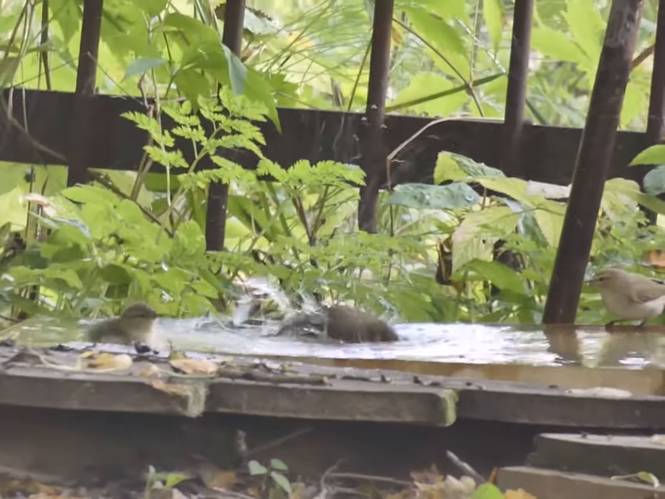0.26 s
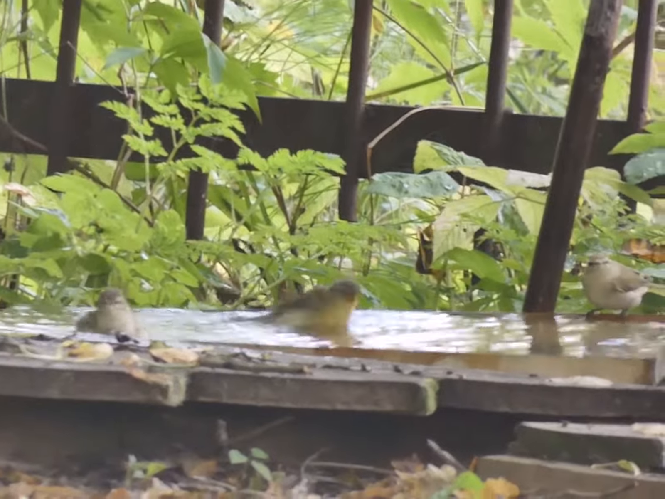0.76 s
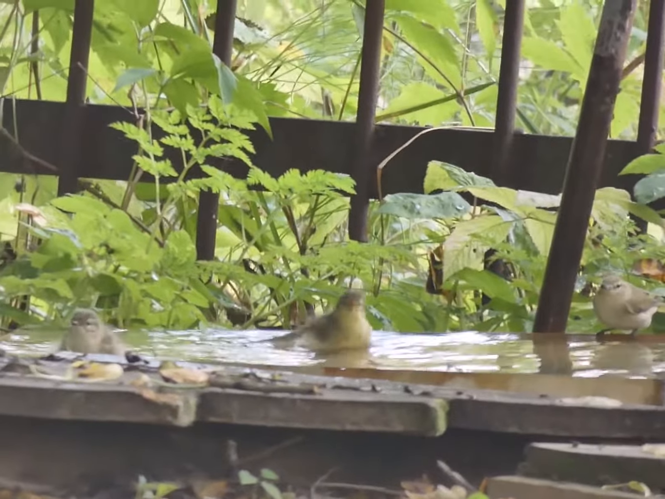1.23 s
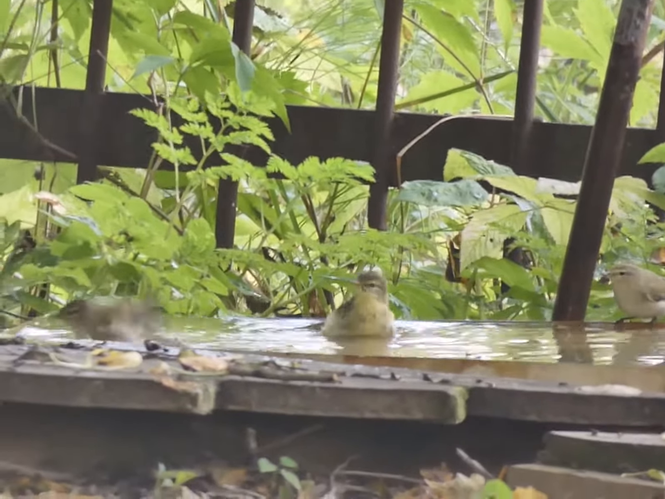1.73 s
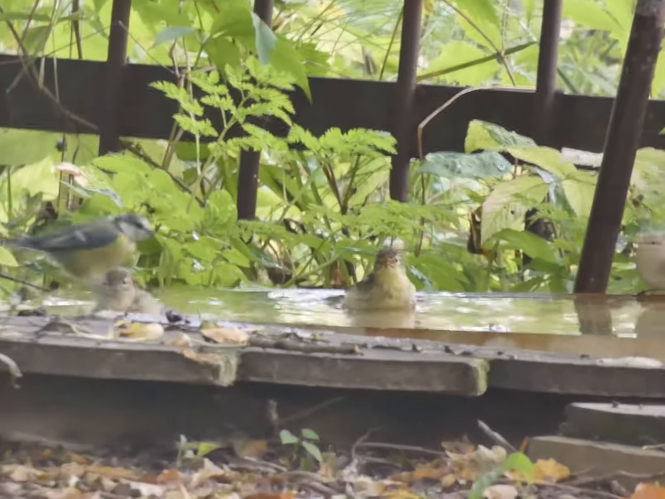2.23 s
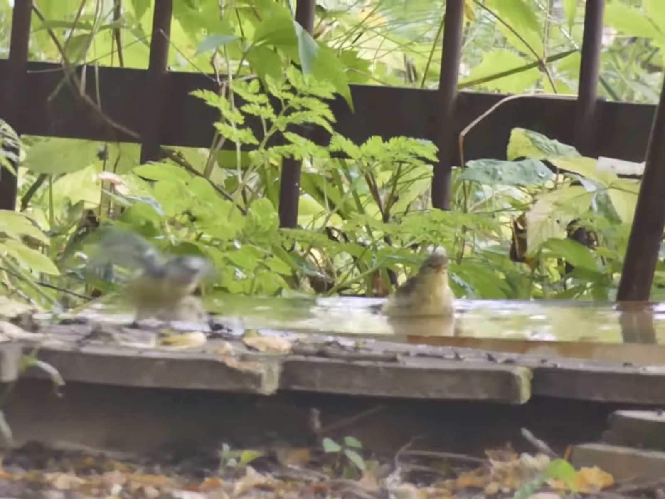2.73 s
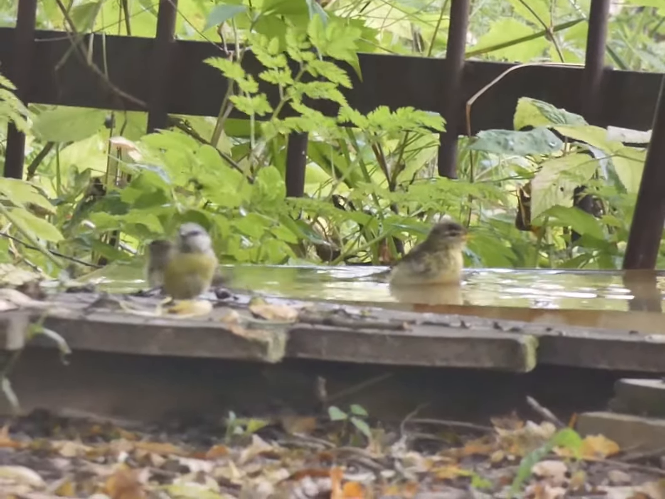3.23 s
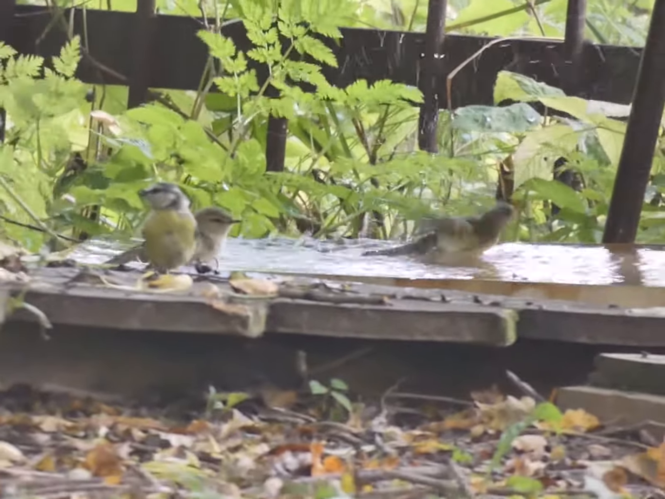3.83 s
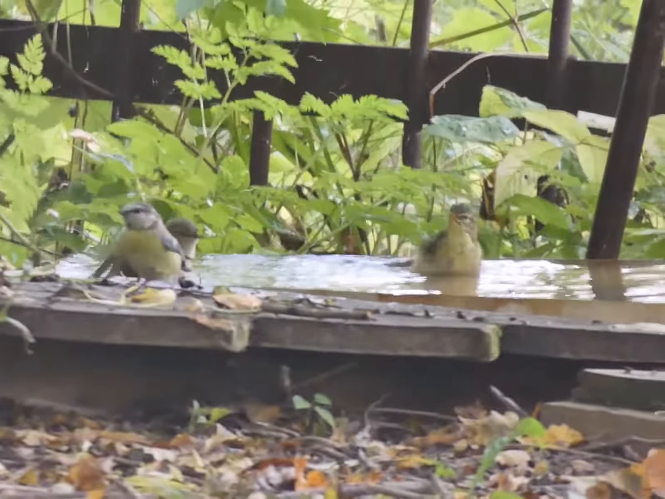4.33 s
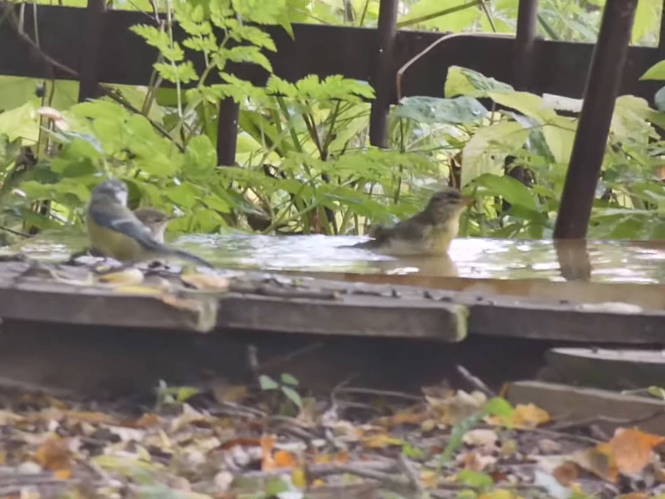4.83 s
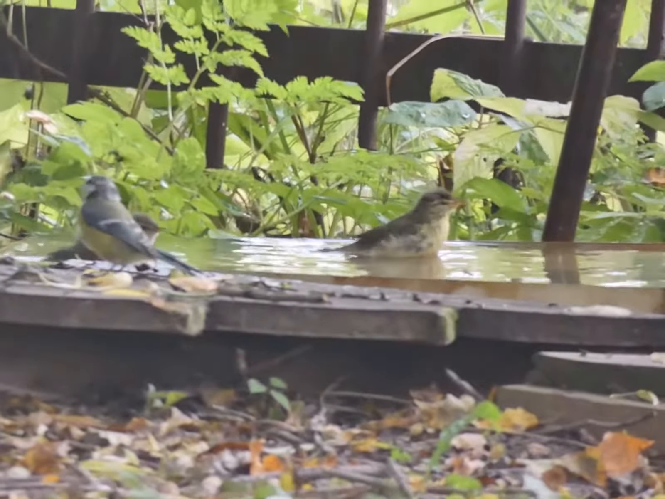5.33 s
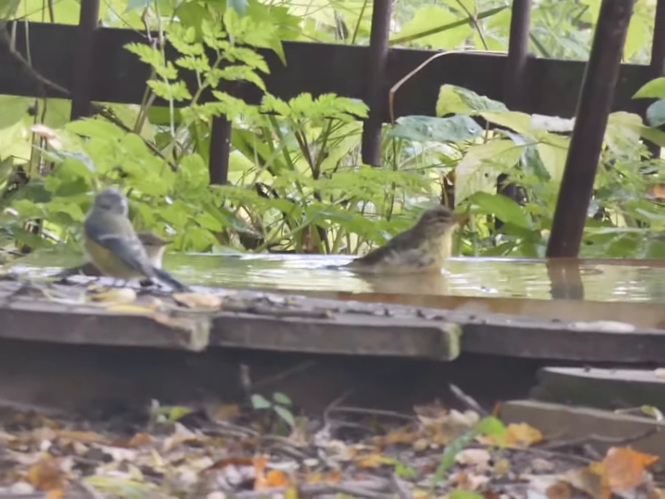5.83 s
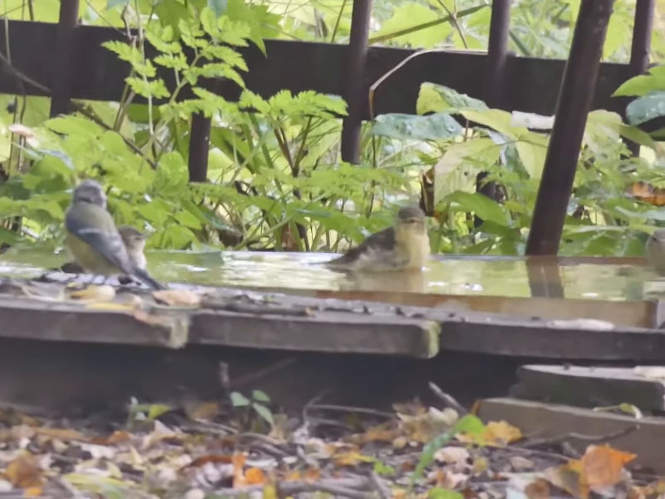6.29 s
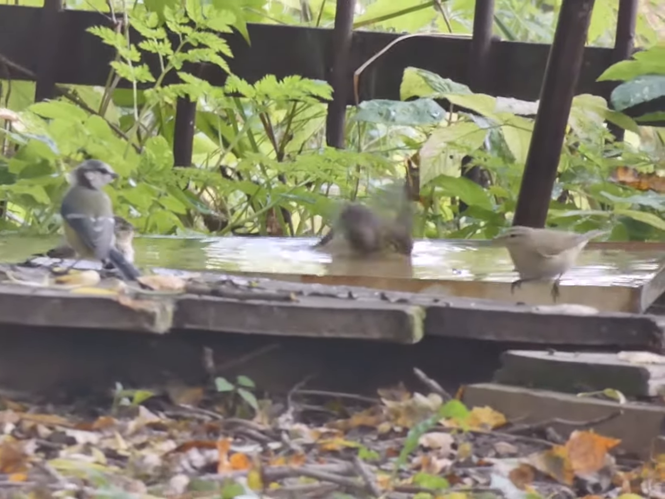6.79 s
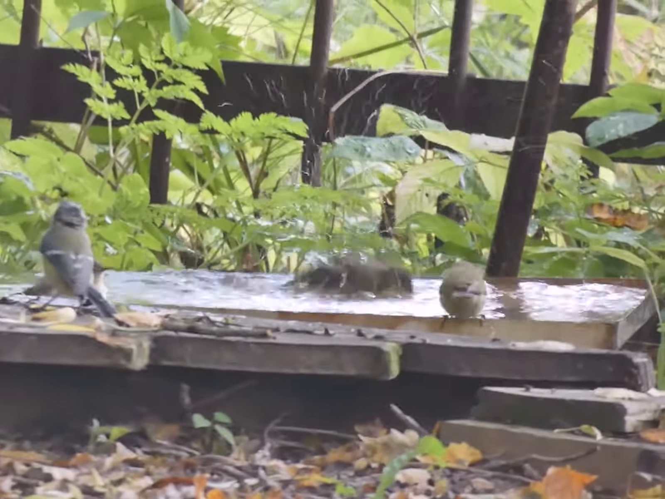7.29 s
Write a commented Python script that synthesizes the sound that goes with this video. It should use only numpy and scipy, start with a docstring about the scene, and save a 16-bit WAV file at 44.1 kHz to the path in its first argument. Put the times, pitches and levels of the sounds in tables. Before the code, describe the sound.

A steady, nearly central hiss runs throughout, with low outdoor rumble and a hollow distant drone around 640 Hz that swells, sinks and flutters, with brief throbs mostly in the first two seconds. A very faint bubbly spray of bathing opens the scene until 0.45 s. Weak wing puffs start at 1.05 s; a stronger low, soft flurry runs from 1.7 to 2.3 s, stirring rumbly air. Another faint splash comes at 3.4-3.9 s. From 3.65 s a small bird twitters: short chirps and thin, rapidly gliding whistles between 4 and 8.5 kHz, busy until 5 s, a tiny tray tick at 4.28 s, then brightest at 5.55-5.95 s and continuing to 6.6 s. The drone drops out briefly near 6.05 s. Small wing puffs follow at 6.5-6.7 s and faintly after 7 s. Sparse chirps come at 6.7, 6.85 and 7.36 s, with a last faint spray at 6.9-7.4 s. The birds are straight ahead, with only slight leafy scatter.

```python
"""One of the small birds bathing in a garden tray twitters in the second half: thin gliding whistles.
Three faint bouts of bathing are sprays of ringing bubbles; the tray gives a tick of filtered noise.
Wings puff the air in short low swings with stirred air around them, as birds come and go.
Behind them lie a steady hiss and low outdoor rumble, both shaped noise, and a hollow distant drone
of resonant noise with brief throbs. The birds are straight ahead of the microphones."""
import sys
import numpy as np
from scipy import signal
from scipy.fft import rfft, irfft, next_fast_len
from scipy.io import wavfile
from scipy.ndimage import uniform_filter1d

SR = 44100
rng = np.random.default_rng(int(sys.argv[2]) if len(sys.argv) > 2 else 0)


def master_out(mix):
    """Clip the mix to full scale and print it as 16-bit PCM to the path in sys.argv[1]."""
    frames = np.transpose(np.atleast_2d(mix))
    ceiling = np.clip(frames, -1, 1)
    pcm = np.round(ceiling * 32767).astype(np.int16)
    wavfile.write(sys.argv[1], SR, pcm)


N = 332955
TIME = np.arange(N) / SR
HOP = 256  # samples between noise frames
BINS = np.fft.rfftfreq(4 * HOP, 1 / SR)
FRAMES = np.arange(N // HOP + 5) * HOP / SR

# puffs of air from wing strokes: (time [s], level [dB], pitch [Hz], length [s])
WING_PUFFS = [(1.053, -45, 199, 0.01), (1.177, -45, 220, .009), (1.243, -43.5, 197, 0.01),
              (1.585, -44.5, 150, .011), (1.712, -35, 187, 0.009), (1.718, -38, 340, 0.0068),
              (1.739, -37, 195, 0.012), (1.799, -27.5, 180, 0.013), (1.824, -30.5, 314, 0.0094),
              (1.843, -39, 245, .016), (1.889, -39.5, 292, 0.013), (1.916, -42, 188, 0.017),
              (2.048, -38, 330, .008), (2.081, -32.5, 400, .01), (2.094, -33.5, 300, 0.007),
              (2.187, -44, 240, 0.013), (2.283, -41, 266, 0.012), (6.53, -44, 200, 0.014),
              (6.585, -41, 165, 0.016), (6.68, -31.5, 205, 0.0085), (6.717, -49, 215, 0.037),
              (7.053, -45, 177, .024), (7.215, -48.5, 150, 0.024)]
# the hiss, before its two parts are blended: (time [s], treble level [dB], body level [dB])
HISS_COURSE = [(0.0, -45.5, -48.5), (0.06, -43, -48), (1.68, -41.5, -46.5), (1.74, -45, -48),
               (1.88, -45, -50), (2.06, -41, -44.5), (2.1, -47, -49.5), (2.33, -42, -45.5),
               (3.61, -44, -47), (3.78, -44.5, -49), (6.94, -47.5, -50), (7.55, -47.5, -49)]


def amp(db):
    """Decibels to gain."""
    return 10 ** (np.asarray(db) / 20)


def unit(x):
    """Scales to an rms of 1."""
    return x / np.sqrt(np.mean(x ** 2) + 1e-20)


def colour(points):
    """A table over log frequency, read at every bin."""
    hz, value = np.transpose(points)
    return np.interp(np.log(BINS + 1), np.log(hz + 1), value)


def course(rows, column=1):
    """One column of a curve over time, read at every frame."""
    rows = np.array(rows)
    return np.interp(FRAMES, rows[:, 0], rows[:, column])[:, None]


def add(mix, s, sound):
    """Mixes a sound in at s seconds."""
    part = mix[max(round(s * SR), 0):][:len(sound)]
    part += sound[:len(part)]


def waver(size, hz):
    """Smooth random motion of rms 1, up to about hz."""
    length = next_fast_len(size)
    spectrum = rfft(rng.standard_normal(length))
    lowpass = np.exp(-(np.fft.rfftfreq(length, 1 / SR) / hz) ** 2)
    return unit(irfft(spectrum * lowpass, length))[:size]


def per_band(shape, lo_hz, hi_hz):
    """Scales a spectrum so that its noise has rms 1 within a band."""
    inside = (BINS > lo_hz) * (BINS < hi_hz)
    return shape / np.sqrt(np.mean(shape ** 2 * inside))


def noise(gain, patchy_db):
    """Stereo noise under a gain over frames and bins, with drifting patches."""
    # stereo width of the noise: (frequency [Hz], side over mid [dB])
    width = [(100, -17), (600, -20), (1000, -19), (5000, -23), (9000, -20), (12000, -14.5), (15000, -11)]
    a, b, c, d, patches = rng.standard_normal((5, len(FRAMES), len(BINS)))
    patches = uniform_filter1d(patches, size=8, axis=0)
    patches = unit(uniform_filter1d(patches, size=9, axis=1))
    mid = a + 1j * b
    side = amp(colour(width)) * (c + 1j * d)
    z = np.array([mid + side, mid - side]) * gain * amp(patchy_db * patches)
    sound = signal.istft(z, nperseg=4 * HOP, noverlap=3 * HOP, time_axis=1, freq_axis=2)[1]
    return sound[:, :N] * np.sqrt(3 / (4 * HOP))  # undoes the scaling of the transform


def whistle(hz, db, jitter=0.0055, shimmer=0.11):
    """One thin tone that follows a pitch and a level, both trembling slightly."""
    size = len(hz)
    pitch = uniform_filter1d(hz, size=130) * (1 + jitter * waver(SR // 4, 430)[:size])
    loud = amp(db) * (1 + shimmer * waver(SR // 4, 240)[:size])
    loud = loud * signal.windows.tukey(size, .04)
    return np.sqrt(2) * loud * np.sin(2 * np.pi * np.cumsum(pitch) / SR)


def chips(before_bend=2.97, after_bend=1.3, turn_s=0.0022, lag_s=0.0071, onset_db=-45, end_db=-48):
    """Short chirps: the pitch bends at a turn, peaking, falling or rising on; loudest just behind it."""
    # (turn time [s], time before [s], time after [s],
    #  start pitch [Hz], turn pitch [Hz], end pitch [Hz], level [dB])
    chip_notes = [(3.66, 0.012, 0.036, 7700, 7250, 6100, -36), (4.008, 0.043, .013, 5450, 6660, 5300, -34),
                  (4.548, .014, 0.015, 4020, 4200, 4000, -37), (4.921, .004, .018, 6600, 6530, 6360, -38),
                  (5.183, 0.009, 0.012, 7150, 5440, 4150, -37.5),
                  (5.279, .01, 0.012, 4150, 4350, 4100, -39), (6.701, .007, .025, 7500, 6470, 5950, -42),
                  (6.845, .035, .03, 4700, 5300, 5440, -40), (7.36, .008, 0.043, 6200, 6100, 5600, -43)]
    out = np.zeros(N)
    for s, before, after, start_hz, turn_hz, end_hz, db in chip_notes:
        t = np.arange(-before, after, 1 / SR)
        from_turn = np.hypot(t, turn_s) - turn_s  # the turn is rounded over turn_s
        near = np.clip(1 - from_turn / np.where(t < 0, before, after), 0, 1)
        # a bend above 1 makes the sweep steepest near the turn
        approach = start_hz + (turn_hz - start_hz) * near ** before_bend
        departure = end_hz + (turn_hz - end_hz) * near ** after_bend
        hz = np.where(t < 0, approach, departure)
        away = np.interp(t, [-before, min(lag_s, after / 2), after], [-1, 0, 1])  # 0 where loudest
        faint_db = np.where(away < 0, onset_db, end_db)
        add(out, s - before, whistle(hz, db + (faint_db - db) * abs(away) ** 0.8))
    return out


def warbles(db=0):
    """The bird winds through each longer note as one unbroken whistle."""
    # one list for each note, with rows of (time [s], pitch [Hz], level [dB])
    winding_notes = [
        [(3.86, 5640, -42), (3.877, 6000, -36), (3.888, 5730, -33), (3.906, 6400, -44)],
        [(4.088, 4900, -45), (4.108, 4970, -36), (4.132, 5760, -44), (4.141, 7600, -41), (4.16, 6500, -36),
         (4.18, 5800, -40), (4.205, 5450, -54)],
        [(4.264, 6500, -34), (4.273, 5300, -33.5), (4.283, 4820, -39), (4.303, 6150, -32.5), (4.316, 5700, -34),
         (4.322, 5760, -31), (4.33, 6950, -30), (4.34, 6300, -36)],
        [(4.406, 6500, -37), (4.413, 6050, -29.5), (4.42, 5470, -36), (4.441, 5480, -35), (4.452, 5860, -30),
         (4.461, 5570, -38)],
        [(4.561, 4820, -41), (4.568, 5380, -33), (4.582, 5360, -31), (4.588, 6170, -28), (4.593, 7740, -27.5),
         (4.601, 6260, -33)],
        [(4.664, 4100, -46), (4.68, 4450, -42), (4.691, 5300, -36), (4.699, 5470, -33), (4.708, 4950, -38)],
        [(4.775, 4140, -46), (4.787, 4440, -41), (4.797, 4370, -44), (4.803, 4920, -31), (4.811, 4560, -43.5),
         (4.824, 4300, -44)],
        [(4.93, 4000, -42), (4.953, 4880, -36), (4.975, 4900, -49)],
        [(5.53, 6750, -38), (5.542, 6670, -36), (5.556, 8020, -39), (5.581, 8300, -39), (5.586, 7650, -40)],
        [(5.638, 7550, -44), (5.648, 7180, -32.5), (5.672, 7090, -30), (5.684, 7170, -24), (5.692, 7090, -23),
         (5.7, 7370, -29), (5.705, 7300, -27), (5.711, 7400, -41)],
        [(5.774, 7600, -44), (5.781, 8200, -38), (5.793, 8350, -38), (5.8, 8560, -32), (5.805, 8070, -25),
         (5.811, 6670, -23.5), (5.815, 6050, -29.5), (5.823, 5920, -28), (5.828, 5200, -37), (5.836, 4300, -46)],
        [(5.897, 5300, -44), (5.907, 4450, -43), (5.912, 5660, -34), (5.917, 7600, -26), (5.922, 8100, -26),
         (5.93, 6800, -22), (5.937, 5040, -37), (5.945, 3950, -46)],
        [(6.01, 4950, -43), (6.026, 5630, -38), (6.037, 5850, -36), (6.044, 6850, -33), (6.053, 7140, -29.5),
         (6.067, 6660, -35), (6.098, 5900, -42)],
        [(6.162, 6480, -36), (6.166, 6400, -33), (6.183, 5990, -32), (6.196, 5980, -36), (6.213, 4600, -52),
         (6.232, 4120, -43)],
        [(6.386, 7440, -44), (6.412, 6430, -34), (6.424, 6300, -43), (6.435, 5920, -31), (6.449, 5480, -43),
         (6.467, 5600, -40), (6.477, 5970, -33), (6.496, 6460, -31), (6.503, 5950, -37)],
        [(6.562, 6700, -41), (6.575, 6680, -38), (6.583, 6450, -32), (6.594, 6360, -35), (6.603, 6840, -34),
         (6.61, 6350, -33), (6.617, 5500, -36), (6.624, 5200, -43)],
    ]
    out = np.zeros(N)
    for note in winding_notes:
        s, hz, level = np.transpose(sorted(note))
        t = np.arange(s[0], s[-1], 1 / SR)
        add(out, s[0], whistle(np.interp(t, s, hz), db + np.interp(t, s, level)))
    return out


def droplet(hz, cycles):
    """A tiny bubble: a dying ring that rises a little in pitch and radiates little bass."""
    u = np.arange(0, 5, hz / cycles / SR)  # time in decay times, each lasting the given cycles
    ring = np.exp(-u) * np.sin(2 * np.pi * cycles * u * (1 + 0.051 * u))
    highpass = signal.butter(3, 1800, "high", fs=SR, output="sos")
    return signal.sosfilt(highpass, np.concatenate([ring, np.zeros(SR // 200)]))


def splashes(drops_per_s=900, spread_db=4, count=24):
    """Beating wings throw sprays of droplets of many sizes, each size with its own ring."""
    # bouts of bathing: (start [s], end [s], level [dB], wing strokes [1/s])
    bouts = [(0, .45, -60, 21), (3.4, 3.87, -57, 26), (6.9, 7.4, -59, 19.7)]
    effort = np.zeros(N)
    for start, end, db, beat in bouts:
        span = (TIME > start) & (TIME < end)
        strokes = 1 + 0.74 * np.sin(2 * np.pi * beat * TIME[span])
        effort[span] = amp(db) * signal.windows.tukey(span.sum(), .4) * strokes
    falls = rng.random(N) < drops_per_s / SR
    drops = falls * amp(spread_db * np.minimum(rng.exponential(1, N), 4))
    kind = rng.integers(0, count, N)
    spray = np.zeros(N)
    for k, hz in enumerate(np.linspace(2600, 10500, count)):
        spray += signal.oaconvolve(drops * (kind == k), droplet(hz, 1.1))[:N]
    return effort * unit(spray)


def taps(decay_s=.0009):
    """A tiny bright tick from the tray: a dying burst of noise, band-passed."""
    # (time [s], level ahead of the band-pass [dB])
    ticks = [(4.283, -16)]
    out, t = np.zeros(N), np.arange(SR // 100) / SR
    for s, db in ticks:
        add(out, s, amp(db) * np.exp(-t / decay_s) * rng.standard_normal(len(t)))
    return signal.sosfilt(signal.butter(4, [4000, 10000], "band", fs=SR, output="sos"), out)


def garden(x, wet_db=-17, t60=0.11):
    """Faint scatter from leaves and fence: sparse dying echoes, different in each channel."""
    t = np.arange(SR // 2) / SR
    echoes = rng.standard_normal((2, len(t))) * (rng.random((2, len(t))) < .05)
    tail = echoes * (t > .004) * amp(-60 * t / t60)
    tail /= np.linalg.norm(tail, axis=1, keepdims=True)
    return x + amp(wet_db) * signal.fftconvolve(x[None], tail, axes=1)[:, :N]


def wings(db=0, turbulence=0.65, swirl_hz=200, swirl_ratio=1.52):
    """Each stroke leaves a short swing of air, with turbulence around a pitch above its own."""
    out = np.zeros(N)
    swirl = waver(N, swirl_hz)
    for s, level, hz, length in WING_PUFFS:
        span = abs(TIME - s) < 2 * length
        t = TIME[span] - s
        swing = -np.cos(2 * np.pi * hz * t)  # suction at the middle of the stroke
        eddies = swirl[span] * np.sin(2 * np.pi * swirl_ratio * hz * t)
        envelope = np.sqrt(2) * amp(db + level) * np.exp(-(2 * t / length) ** 2)
        out[span] += envelope * (swing + turbulence * eddies)
    return signal.sosfiltfilt(signal.butter(1, 70, "high", fs=SR, output="sos"), out)


def wake(db=-11.0, rise_s=.013, decay_s=.036, hz=210):
    """Stirred air builds just before each wing stroke and rumbles on after it, joining the puffs."""
    s, level = np.transpose(WING_PUFFS)[:2]
    t = FRAMES[:, None] - s
    power = (amp(db + level) * np.exp(-abs(t) / np.where(t < 0, rise_s, decay_s))) ** 2
    shape = unit(np.exp(-2 * np.log((BINS + 1) / hz) ** 2))  # a broad hump around hz
    return noise(shape * np.sqrt(power.sum(axis=1, keepdims=True)), patchy_db=-1.5)


def hiss():
    """Steady noise, nearly central, whose treble and body each follow their own level."""
    # spectrum: (frequency [Hz], relative level per Hz [dB])
    hiss_colour = [(60, -67), (800, -20), (960, -12), (1160, -5), (1650, -4.5), (2000, -9), (2320, -4),
                   (3300, -8.5), (4000, -4), (5500, 0), (7500, -3.5), (10000, -6), (11800, -14),
                   (14500, -10), (15800, -15.5)]
    shape = amp(colour(hiss_colour))
    treble = per_band(shape, 9000, 15500) * amp(course(HISS_COURSE))
    body = per_band(shape, 1200, 3500) * amp(course(HISS_COURSE, column=2))
    share = colour([(2500, 0.031), (6000, 0.6), (12000, 0.9)])  # of the treble, by frequency
    return noise(share * treble + (1 - share) * body, patchy_db=1.66)


def hum():
    """Noise held in the drone's resonances: tones that wander in strength and phase."""
    # (frequency [Hz], width [Hz], relative level [dB])
    modes = [(644, 19.3, 0), (641, 78, -2.5), (577.7, 32, -3), (703, 45, -8), (488, 29, -13.5)]
    out = np.zeros(N)
    for hz, width, level in modes:
        cosine = waver(N, width) * np.cos(2 * np.pi * hz * TIME)
        sine = waver(N, width) * np.sin(2 * np.pi * hz * TIME)
        out += amp(level) * (cosine + sine)
    return unit(out)


def drone(db=0.0, flutter_db=2.5, steadiness=0.39, lull_at_s=6.06, lull_length_s=0.054, lull_db=-26):
    """A far-off hollow drone that swells, sinks and flutters, nearly the same in both channels."""
    # (time [s], level [dB]), ahead of the lull
    swells = [(0.0, -46.5), (0.7, -50.5), (1.05, -50.5), (1.4, -47), (1.98, -43.5), (2.06, -42),
              (2.11, -46), (2.86, -44), (3.12, -53.5), (3.6, -51.5), (4.27, -45), (4.35, -44), (4.39, -54),
              (4.48, -49.5), (5.05, -43.5), (5.22, -52.5), (5.8, -44.5), (6.16, -47.5), (6.95, -43),
              (7.35, -41), (7.55, -48)]
    s, level = np.transpose(swells)
    lull = lull_db * np.exp(-((TIME - lull_at_s) / lull_length_s) ** 2)  # it drops out briefly
    tone = hum()
    tone = unit(tone / uniform_filter1d(tone ** 2, size=5000) ** steadiness)  # evens out slow surges
    side = amp(-24) * hum()
    flutter = unit(amp(flutter_db * waver(N, 25)))
    loud = amp(db + np.interp(TIME, s, level) + lull) * flutter
    return loud * (tone + np.array([side, -side]))


def throbs(db=0, hz=645, length_s=0.016):
    """The drone's main tone swells and dies in a few hundredths of a second."""
    # (time [s], level [dB])
    pulses = [(.09, -41.5), (.24, -43), (.37, -40), (.47, -43), (.61, -44), (.73, -42.5), (.84, -44),
              (1.12, -43), (1.89, -39.5), (2.05, -35), (3.18, -42.5), (6.96, -36)]
    out = np.zeros(N)
    for s, level in pulses:
        swell = np.sqrt(2) * amp(db + level) * np.exp(-((TIME - s) / length_s) ** 2)
        out += swell * np.cos(2 * np.pi * (hz * TIME + rng.random()))
    return out


def rumble(db=-50.5, follow=0.46):
    """Low outdoor air, as shaped noise that partly follows the body of the hiss."""
    # spectrum: (frequency [Hz], relative level per Hz [dB])
    rumble_colour = [(20, -35), (55, -35), (85, -17), (130, -7.5), (175, -1), (300, 0.8), (480, 3.5),
                     (760, -1), (930, -7), (1400, -24.5)]
    # change of the deepest part: (time [s], level [dB])
    bass_course = [(0, -6), (1.9, 9), (2.35, -19), (2.8, -8), (3.05, 1), (4, -4), (7.5, -3)]
    swell = course(HISS_COURSE, column=2)
    bass = course(bass_course) / (1 + (BINS / 130) ** 4)  # fades out above 130 Hz
    level = db + bass + follow * (swell - swell.mean())
    return noise(unit(amp(colour(rumble_colour))) * amp(level), patchy_db=1.5)


def hollow(x, centre_hz=970, width_hz=85):
    """Cuts a hollow of shifting depth into the background: a narrow notch with sloping sides."""
    # (time [s], depth [dB])
    depths = [(0, 6), (2.4, 8), (2.85, 2), (3.6, 9), (4.33, 17), (4.42, 4), (5.6, 11), (6.1, 4), (6.4, 8),
              (6.85, 27), (7.5, 17)]
    hz, s, z = signal.stft(x, SR, nperseg=8 * HOP, noverlap=6 * HOP)
    depth = np.interp(s, *np.transpose(depths))
    notch = np.exp(-((hz[:, None] - centre_hz) / width_hz) ** 2)
    return signal.istft(z * amp(-depth * notch), SR, nperseg=8 * HOP, noverlap=6 * HOP)[1][:, :N]


def scene():
    """The birds, straight ahead, over the background."""
    birds = garden(chips() + warbles() + splashes() + taps())
    air = wings() + wake()
    background = hollow(hiss() + drone() + throbs() + rumble())
    return birds + air + background


def record(dry):
    """The recorder's band limit: a steep low-pass at 15750 Hz."""
    lowpass = signal.firwin(1023, 15750, window=("kaiser", 9), fs=SR)
    return signal.oaconvolve(dry, lowpass[None], "same")


dry = scene()
out = record(dry)
master_out(out)
```